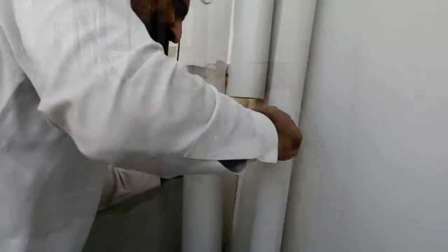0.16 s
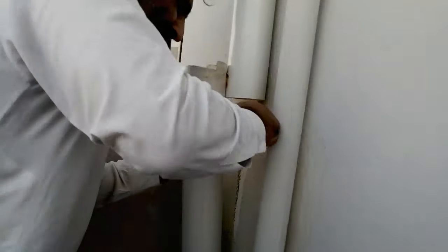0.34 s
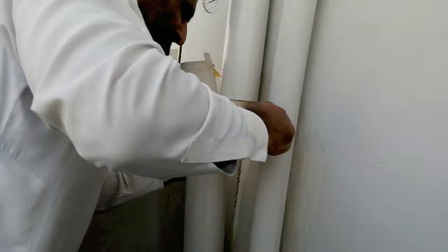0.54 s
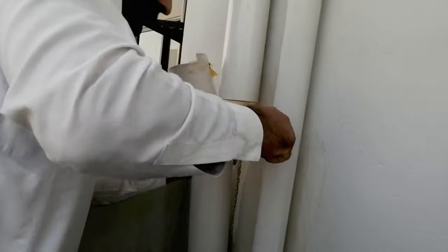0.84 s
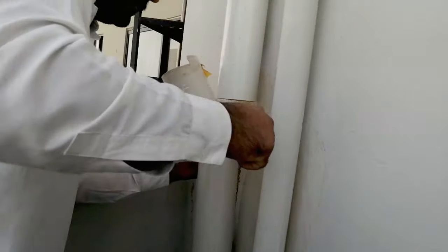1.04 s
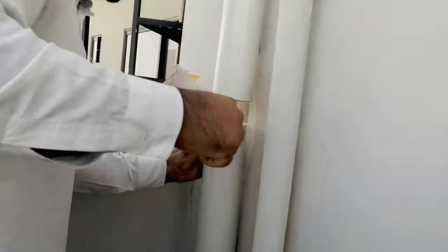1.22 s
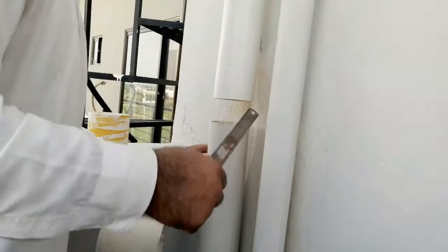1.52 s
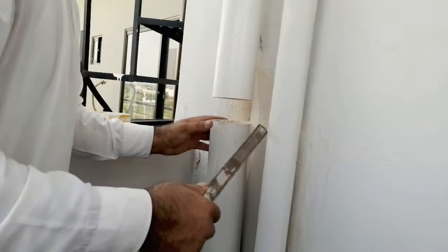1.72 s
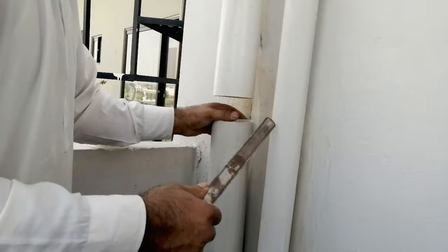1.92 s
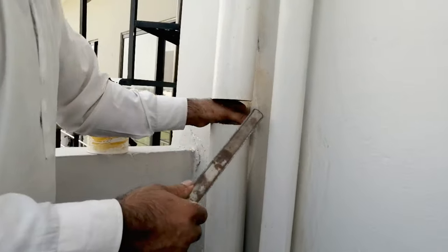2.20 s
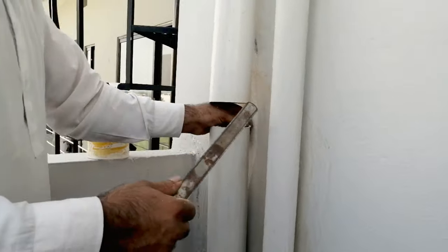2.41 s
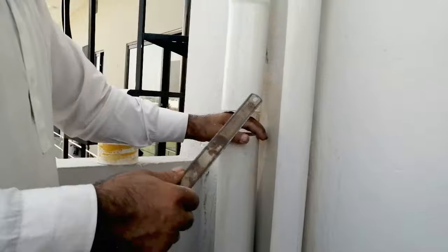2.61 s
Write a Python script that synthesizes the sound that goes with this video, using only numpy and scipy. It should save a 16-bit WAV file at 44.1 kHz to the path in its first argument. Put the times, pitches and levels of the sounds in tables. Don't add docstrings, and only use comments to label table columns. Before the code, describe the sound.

On an open balcony, a bare saw blade makes its last fast rasps in a plastic pipe, which booms free and is damped; close-up rubbing, small knocks and sharper late taps follow over distant town hum.

```python
import sys
import numpy as np
from scipy import signal
from scipy.fft import rfft, irfft
from scipy.io import wavfile
from scipy.ndimage import uniform_filter1d

SR = 44100
rng = np.random.default_rng(int(sys.argv[2]) if len(sys.argv) > 2 else 0)


def materialize(psi):
    bounded = np.clip(np.atleast_2d(psi).T, -1, 1)
    quanta = np.round(bounded * 32767).astype(np.int16)
    wavfile.write(sys.argv[1], SR, quanta)


def nominal_scale(level):
    x = np.asarray(level, float) / 20
    return 10 ** x


N = 121275
T = np.arange(N) / SR

# [f/Hz, level/dB per Hz]
TOWN_SPECTRUM = [(12, -40), (20, -16.5), (310, -7), (796, -13.5), (1080, -15.5), (1460, -23), (2500, -24.5),
                 (5090, -30.5), (15000, -41)]
TOWN_DB = -56.5
RUMBLE_HZ, RUMBLE_DB, RUMBLE_FADES_S = 53.7, -53.5, 0.9

# [start t/s, length/s, teeth level/dB, change over the stroke/dB, pipe level/dB]
STROKES = [(-.03, 0.048, -29, -15, -29), (0.019, 0.8, -49, -8.5, -41.5), (0.077, 0.056, -41, -1.5, -35),
           (0.13, 0.039, -37.5, -7.5, -40), (0.243, 0.05, -27.5, 0, -28), (0.289, 0.06, -32, 0.5, -34.5),
           (0.389, 0.056, -35, -2, -30), (0.424, 0.052, -32.5, -5, -29), (0.466, 0.048, -48, 4.5, -39.5),
           (0.555, 0.061, -28.5, -2.5, -27), (0.62, 0.035, -24, -1.5, -27.5), (0.668, 0.053, -35, -7, -37)]
# [f/Hz, level/dB, t60/s]
PIPE_MODES = [(140, -11, 0.078), (375, -1.5, 0.047), (528, 3.5, 0.035), (578, -2.5, 0.069),
              (677, 0.5, 0.049), (844, 1.5, 0.03), (1000, 2, 0.026), (1235, -7, 0.026), (1394, -3.5, 0.045)]
# [f/Hz, width/Hz, level/dB]
WALL_BANDS = [(1296, 630, 4.5), (2000, 490, -8), (2615, 470, -0.5), (3160, 170, -11.5), (5000, 5100, -23),
              (11100, 8700, -49)]
# [start t/s, length/s, lower mode level/dB, upper mode level/dB]
SURGES = [(.02, .02, -46.5, -39), (0.076, 0.06, -38, -40.5), (0.138, 0.035, -32.5, -36.5),
          (0.227, 0.056, -55, -31), (0.261, 0.021, -48, -31.5), (0.317, 0.052, -43, -40),
          (0.403, 0.021, -26, -28.5), (0.45, 0.0464, -36, -31), (0.566, 0.055, -45, -40),
          (0.627, 0.036, -57, -31), (0.654, 0.023, -37.5, -39)]
# [f/Hz, level/dB, t60/s]
BENDING_MODES = [(273.2, 0, 0.15), (308.4, 0, 0.078)]
TEETH_PER_S, TOOTH_JITTER, TOOTH_SCATTER_DB, GRIT_DB = 310, .3, 2.5, 3
STROKE_ATTACK_S, STROKE_RELEASE_S = 0.026, 0.01
PIPE_DB = -3.5
BITE_WALK_DB, LOAD_WALK_DB, WALL_WALK_DB, MODE_WALK_DB = 1.0, 1.2, 2.0, 2.0

# [t/s, level/dB]
TICKS = [(0.062, -26), (0.2059, -37), (0.2294, -26), (0.2765, -21), (0.416, -36), (0.5914, -15),
         (0.6362, -4), (0.7911, -47), (0.82, -48), (0.852, -46), (0.902, -41), (1.0021, -37), (1.1398, -41),
         (1.2371, -39), (1.252, -25), (1.344, -12), (1.4044, -25), (1.4481, -18), (1.4794, -23),
         (1.543, -25), (1.6626, -43), (1.8455, -14), (1.8891, -36), (1.927, -29), (1.949, -43),
         (2.3206, -33), (2.3445, -25), (2.4548, -29), (2.5002, -29)]
TICK_DB, TICK_T60_S = -13, 0.0085
CRACK_RISE_S, CRACK_T60_S = 0.00157, 0.036
CRACK_HZ, CRACK_WIDTH_HZ = 4080, 2670

# [start t/s, length/s, level/dB, first f/Hz, last f/Hz]
SQUEAKS = [
    (0.175, .07, -61.5, 5180, 5230),
    (1.326, 0.11, -47.5, 1500, 1530),
    (1.698, .13, -62.5, 5000, 5240),
]
SQUEAK_WIDTH = .08

# [f/Hz, level/dB, t60/s]
FREED_MODES = [(169.6, -1, 1), (255, -11, .5), (363, -8.5, .7), (455.6, -5.5, 0.29), (634, -9, 0.2),
               (994, -14, .12)]
FREED_S, FREED_DB = .654, -28

# [start t/s, length/s, notes per s, level/dB]
TRILLS = [
    (0.698, 0.24, 27.5, -60),
    (1.575, 0.094, 34, -63.5),
    (1.718, 0.25, 106, -69),
    (1.921, 0.032, 54.4, -55),
    (2.087, 0.045, 70, -92),
]
BIRD_HZ, BIRD_DROP_HZ = 5680, 446

# [t/s, level/dB, f/Hz, t60/s]
KNOCKS = [
    (0.91, -35.5, 433, 0.12),
    (.91, -40.5, 1350, 0.21),
    (0.858, -43.5, 316, 0.68),
    (1.904, -39, 253, 0.091),
    (2.488, -41.5, 410, 0.091),
    (2.509, -46, 600, 0.15),
    (2.66, -65, 960, 0.22),
]

# [start t/s, length/s, level/dB, change/dB, ring f/Hz]
SCUFFS = [(0.882, 0.095, -45, 3, 2190), (0.982, 0.079, -36.5, -2, 2080), (1.065, 0.033, -47, 1, 1850),
          (1.122, 0.08, -64, 5.5, 3000), (1.191, 0.098, -55.5, 0, 3300), (1.256, 0.084, -53, 12, 2700),
          (1.337, 0.1, -40, -2.5, 2500), (1.435, 0.066, -44, 6.5, 2060), (1.499, 0.057, -40.5, 3, 2000),
          (1.583, 0.037, -54.5, -4, 3230), (1.649, 0.036, -52.5, -6.5, 2300),
          (1.807, 0.048, -50.5, 11, 2360), (1.837, 0.043, -34, -3.5, 1680),
          (1.877, 0.027, -37.5, -1.5, 2170), (1.932, 0.028, -49.5, -5.5, 2000),
          (2.311, 0.066, -53, 7, 2500), (2.383, 0.065, -51.5, 3.5, 2300), (2.436, 0.067, -46, 0.5, 3000),
          (2.491, 0.074, -40.5, -6, 2750), (2.61, 0.12, -62, 0.5, 3000)]
# [f/Hz, level/dB]
SCUFF_HISS = [(300, -19), (800, -4.5), (1500, 2), (3000, 7.5), (6000, 0.5), (9000, 1.5), (15000, -3)]
SCUFF_ATTACK_S, SCUFF_RELEASE_S, GRAINS_PER_S = 0.016, 0.011, 5000
RING_DB, OVERTONE, OVERTONE_DB, RING_WIDTH, RING_WANDER = -11, 1.6, -12, .17, .06

# [t/s, crack level/dB, ring level/dB, object number from 0]
TAPS = [
    (1.085, -35.5, -63, 2),
    (1.195, -39.5, -65, 2),
    (1.262, -35, -78, 2),
    (1.983, -16, -28, 0),
    (2.160, -23, -24.5, 1),
    (2.257, -27, -27.5, 3),
    (2.58, -20.5, -50, 2),
    (2.657, -42, -48, 1),
    (2.722, -39.5, -65, 2),
]
# [f/Hz, level/dB, t60/s]
OBJECTS = [
    [(1110, -12, 0.092), (1110, -4, 0.064), (1350, -10, 0.047), (2300, 3, 0.018), (2540, -48, 0.085),
     (3470, 0.5, 0.038), (4700, -33, 0.026), (6020, -18, 0.06)],
    [(233, -11.5, 0.18), (570, -4.5, 0.07), (700, -8, 0.017), (1125, -8, 0.016), (1350, -20, 0.025),
     (1860, -18, 0.032), (2500, -10.5, 0.058)],
    [(1440, -27, 0.027), (2693, -66, 0.035), (3300, -30, 0.015), (4550, 17, 0.028), (6070, -12, 0.023)],
    [(241, -8, 0.11), (317, -5, 0.076), (600, -6, 0.036), (790, -15.5, 0.066), (1043, -17, 0.063),
     (3000, -12.5, 0.032)],
]
RATTLE_T60_S, RATTLE_DB = 0.04, -18
TAIL_HZ, TAIL_DB, TAIL_T60_S = 634, -19, 0.22
LONGEST_RING_S, LOW_RING_SHARE = .055, .6

# [f/Hz, level/dB]
LEFT_MIC = [(300, -1), (1300, 1), (2400, -3.5), (3800, -7.5), (6000, 5), (7300, 2), (8500, -4.5),
            (15000, -16)]
# [f/Hz, level/dB]
RIGHT_MIC = [(300, -1), (1300, 2.5), (3000, 4.5), (4000, -2.5), (5350, 9.5), (6800, 3.5), (8000, -10),
             (15000, -2.5)]
HAND_MOVES_S, HAND_LEFT_DB = 2.037, 4.5
ALIKE_HZ, TREBLE_SHARED, ROOM_T60_S, ROOM_DB = 1154, 0.071, 0.23, -10
PORT_HZ, PORT_WIDTH_HZ, PORT_DB = 5404, 624, 4
TOP_HZ = 15400


def unit(x):
    return x / np.sqrt(np.mean(x ** 2))


def colour(x, points):
    hz, db = np.array(points, float).T
    grid_hz = np.arange(2049) * SR / 4096
    log_gain = np.log(nominal_scale(np.interp(np.log(grid_hz + 1), np.log(hz), db)))
    cepstrum = irfft(log_gain)
    cepstrum[1:2048] *= 2
    cepstrum[2049:] = 0
    impulse = irfft(np.exp(rfft(cepstrum)))
    return signal.fftconvolve(x, impulse.reshape((1,) * (x.ndim - 1) + (-1,)), axes=-1)[..., :N]


def band(x, hz, width_hz):
    return signal.lfilter(*signal.iirpeak(hz, hz / width_hz, fs=SR), x)


def split(x, kind):
    return signal.sosfilt(signal.butter(2, ALIKE_HZ, kind, fs=SR, output="sos"), x)


def ring(x, modes):
    out = 0
    for hz, db, t60 in modes:
        pole = np.exp(2j * np.pi * hz / SR - np.log(1000) / (t60 * SR))
        out = out + nominal_scale(db) * signal.lfilter([1], [1, -pole], x).imag
    return out


def shape(start, length, change_db, attack, release):
    u = T - start
    rise = np.clip(u / attack, 0, 1) ** 2
    slope = nominal_scale(change_db * np.clip(u / length, 0, 1))
    return rise * slope * np.exp(-np.clip(u - length, 0, None) / release)


def fade(s, t60):
    return shape(s, CRACK_RISE_S, 0, CRACK_RISE_S, t60 / np.log(1000))


def walk(rate):
    k = int(SR / rate)
    steps = np.repeat(rng.standard_normal(N // k + 1), k)
    return unit(uniform_filter1d(uniform_filter1d(steps, k), k)[:N])


def click(s, push_s):
    push = np.clip(1 - np.abs(T - s - push_s) / push_s, 0, None)
    return push / push.sum()


def noise():
    both, own = rng.standard_normal(N), rng.standard_normal((2, N))
    treble = np.sqrt(TREBLE_SHARED) * both + np.sqrt(1 - TREBLE_SHARED) * own
    return split(both, "low") + split(treble, "high") + nominal_scale(-17) * own[::-1]


def slide(x, hz, width):
    turn = np.exp(2j * np.pi * np.cumsum(hz) / SR)
    lowpass = signal.butter(2, width * np.mean(hz) / 2, fs=SR, output="sos")
    return unit((signal.sosfilt(lowpass, x / turn) * turn).real)


def rubbed_grains():
    hits = uniform_filter1d(1. * (rng.random(N) < GRAINS_PER_S / SR), size=4)
    grains = hits * noise() * nominal_scale(2 * rng.exponential(size=N))
    return unit(grains) + nominal_scale(4.0) * noise()


def rub_flicker():
    return nominal_scale(1.74 * walk(120))


def town():
    hum, swelling = colour(noise(), TOWN_SPECTRUM), 0
    for hz in 30 * 2. ** np.arange(9):
        swelling = swelling + band(hum, hz, hz * .7) * nominal_scale(1.2 * walk(5))
    rumble = unit(band(band(noise(), RUMBLE_HZ, 42), RUMBLE_HZ, 78))
    rumble = rumble * shape(-0.27, 1 + RUMBLE_FADES_S, -6.5, .1, 0.72)
    return nominal_scale(TOWN_DB) * unit(swelling) + nominal_scale(RUMBLE_DB) * rumble


def saw():
    chance = rng.standard_normal((2000, 2)).T
    at = (np.cumsum(np.exp(TOOTH_JITTER * chance[0])) * SR / TEETH_PER_S).astype(int)
    teeth = np.zeros(N)
    teeth[at[at < N]] = nominal_scale(TOOTH_SCATTER_DB * chance[1])[at < N]
    burst = unit(signal.lfilter([1], [1, -np.exp(-1 / (0.0018 * SR))], teeth))
    grit = unit(noise() * (burst + nominal_scale(GRIT_DB)))
    shake = band(unit(teeth) + nominal_scale(-4) * noise(), 450, 1100)

    bite, load = 0, 0
    for s, length, teeth_db, change_db, pipe_db in STROKES:
        stroke = shape(s, length, change_db, STROKE_ATTACK_S, STROKE_RELEASE_S)
        bite = bite + nominal_scale(teeth_db) * stroke
        load = load + nominal_scale(pipe_db) * stroke
    bite = bite * nominal_scale(BITE_WALK_DB * walk(40.0))
    load = load * nominal_scale(LOAD_WALK_DB * walk(38.8))

    wall = 0
    for hz, width_hz, db in WALL_BANDS:
        wall = wall + nominal_scale(db + WALL_WALK_DB * walk(35.7)) * unit(band(grit, hz, width_hz))
    boom = 0
    for k, mode in enumerate(BENDING_MODES):
        surge = sum(nominal_scale(r[2 + k]) * shape(r[0], r[1], 0, 0.0081, 0.0094) for r in SURGES)
        boom = boom + ring(shake * surge, [mode]) / np.sqrt(np.mean(ring(shake, [mode]) ** 2))
    pipe = 0
    for mode in PIPE_MODES:
        pipe = pipe + ring(shake * load * nominal_scale(MODE_WALK_DB * walk(21.14)), [mode])
    pipe = pipe / np.sqrt(np.mean(ring(shake[0], PIPE_MODES) ** 2))
    return boom + bite * unit(wall) + pipe * nominal_scale(PIPE_DB)


def ticks():
    snaps = sum(nominal_scale(db + TICK_DB) * fade(s - CRACK_RISE_S, TICK_T60_S) for s, db in TICKS)
    return band(noise(), CRACK_HZ, CRACK_WIDTH_HZ) * snaps


def squeaks():
    grains, out = rubbed_grains(), 0
    for s, n, db, from_hz, to_hz in SQUEAKS:
        tone = slide(grains, np.interp(T, [s, s + n], [from_hz, to_hz]), SQUEAK_WIDTH)
        out = out + nominal_scale(db) * shape(s, n, 1.15, 0.024, 0.013) * tone
    return out * rub_flicker()


def freed():
    rub = nominal_scale(-38) * noise() * shape(FREED_S, .12, -2, .005, .02)
    damped = np.clip(np.exp(-(T - .785) / .012), nominal_scale(-8), 1)
    held = damped * np.clip((1.03 - T) / .04, 0, 1)
    boom = ring(click(FREED_S, 0.0021), FREED_MODES) + ring(rub, FREED_MODES[1:])
    return nominal_scale(FREED_DB) * boom * held


def bird():
    out, wobble_hz = 0, 120 * walk(31)
    for s, n, rate, db in TRILLS:
        phase = (T - s) * rate % 1
        tone = np.sin(2 * np.pi * np.cumsum(BIRD_HZ - BIRD_DROP_HZ * phase + wobble_hz) / SR)
        pulse = 0.32 + np.sin(np.pi * phase) ** 2
        out = out + nominal_scale(db) * shape(s, n, 0, 0.0089, 0.014) * pulse * tone
    return out * (0.42 + unit(band(noise(), 170, 590)))


def knocks():
    grit, out = noise(), 0
    for s, db, hz, t60 in KNOCKS:
        dull = unit(band(band(grit, hz, 0.34 * hz), hz, 1.3 * hz))
        out = out + nominal_scale(db) * dull * fade(s, t60)
    return out


def scuffs():
    grains, out = rubbed_grains(), np.zeros((2, N))
    hiss, grip = unit(colour(grains, SCUFF_HISS)), 1 + RING_WANDER * walk(25.16)
    for s, n, db, change_db, hz in SCUFFS:
        at = (T > s) & (T < s + n + 10 * SCUFF_RELEASE_S)
        tone = nominal_scale(RING_DB) * slide(grains[:, at], hz * grip[at], RING_WIDTH)
        tone = tone + nominal_scale(OVERTONE_DB) * slide(grains[:, at], hz * OVERTONE * grip[at], RING_WIDTH)
        envelope = shape(s, n, change_db, SCUFF_ATTACK_S, SCUFF_RELEASE_S)[at]
        out[:, at] += nominal_scale(db) * envelope * (hiss[:, at] + tone)
    return out * rub_flicker()


def taps():
    grit = noise()
    cracks = sum(nominal_scale(db) * fade(s, CRACK_T60_S) for s, db, _, _ in TAPS)
    tails = sum(nominal_scale(db + TAIL_DB) * fade(s, TAIL_T60_S) for s, _, db, _ in TAPS)
    out = band(grit, CRACK_HZ, CRACK_WIDTH_HZ) * cracks + unit(band(noise(), TAIL_HZ, 600)) * tails
    for k, modes in enumerate(OBJECTS):
        blows = 0
        for s, _, db, kind in TAPS:
            if round(kind) == k:
                rattle = nominal_scale(RATTLE_DB) * grit * fade(s, RATTLE_T60_S)
                blows = blows + nominal_scale(db) * (click(s + CRACK_RISE_S / 2, .00007) + rattle)
        damped = []
        for hz, db, t60 in modes:
            longest_s = LONGEST_RING_S * max(1, LOW_RING_SHARE * 700 / hz)
            damped.append((hz, db, min(t60, longest_s)))
        out = out + ring(band(blows, 1400, 2800), damped)
    return out


def space(x):
    t = T[:SR // 2]
    tail = rng.standard_normal((2, len(t))) * nominal_scale(-60 * t / ROOM_T60_S)
    tail = tail * np.sqrt(2 * np.log(1000) / (ROOM_T60_S * SR))
    return x + nominal_scale(ROOM_DB) * signal.fftconvolve(band(x, 1820, 11000), tail, axes=-1)[:, :N]


def scene():
    hand = ticks() + squeaks() + knocks() + scuffs() + taps()
    left = nominal_scale(HAND_LEFT_DB * np.clip((T - HAND_MOVES_S) / 0.1 + 1, 0, 1)) - 1
    treble = signal.sosfilt(signal.butter(1, ALIKE_HZ, "high", fs=SR, output="sos"), hand)
    hand = hand + np.array([[1], [0]]) * left * treble
    return space(town() + saw() + freed() + bird() + hand)


def roll_off(x):
    return signal.sosfilt(signal.butter(12, 16370, fs=SR, output="sos"), x)


def record(dry):
    port = dry[1] + nominal_scale(PORT_DB) * band(dry[1], PORT_HZ, PORT_WIDTH_HZ)
    mix = np.array([colour(dry[0], LEFT_MIC), colour(port, RIGHT_MIC)])
    mix = signal.sosfilt(signal.butter(14, TOP_HZ, fs=SR, output="sos"), mix)
    return roll_off(mix)


dry = scene()
out = record(dry)
materialize(out)
```